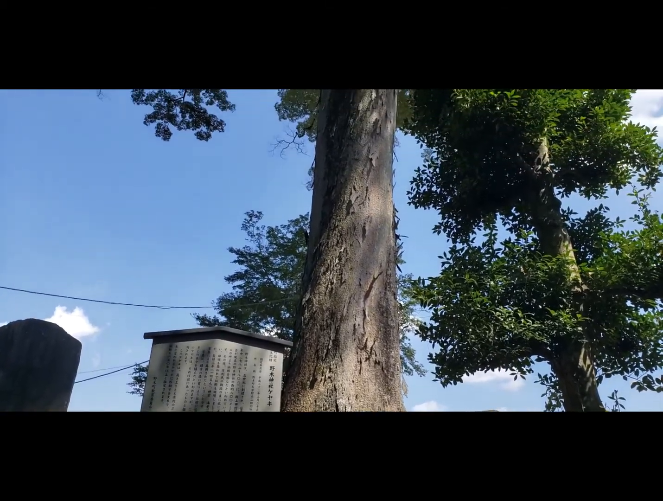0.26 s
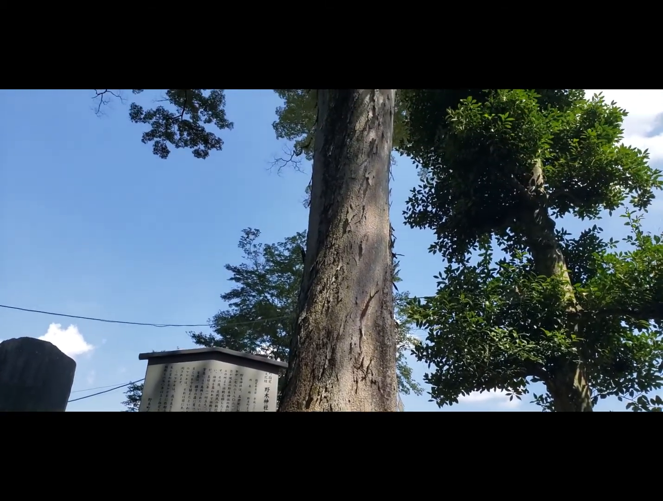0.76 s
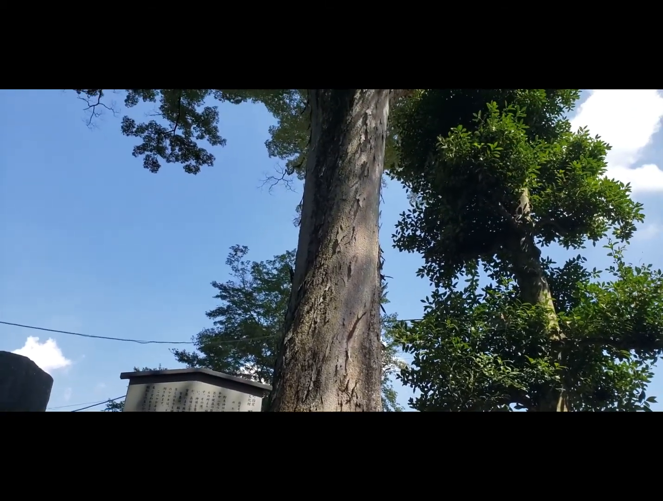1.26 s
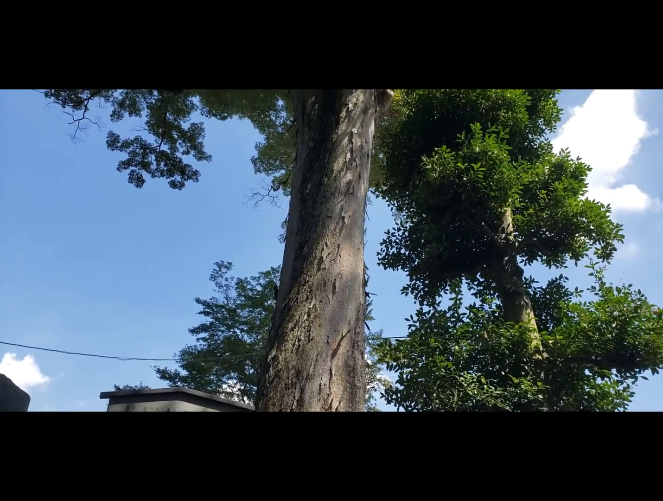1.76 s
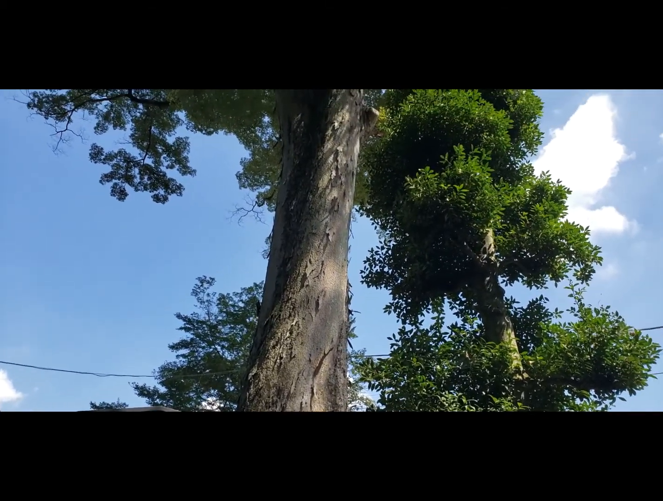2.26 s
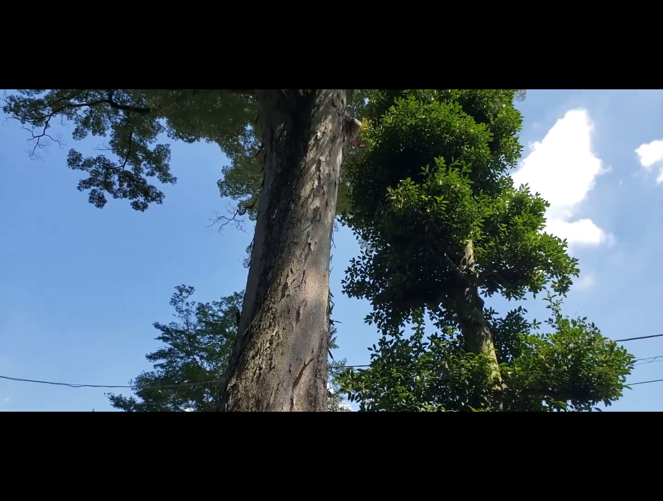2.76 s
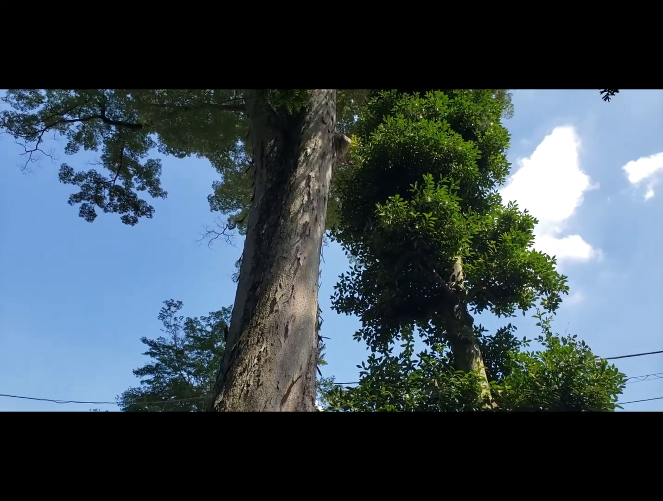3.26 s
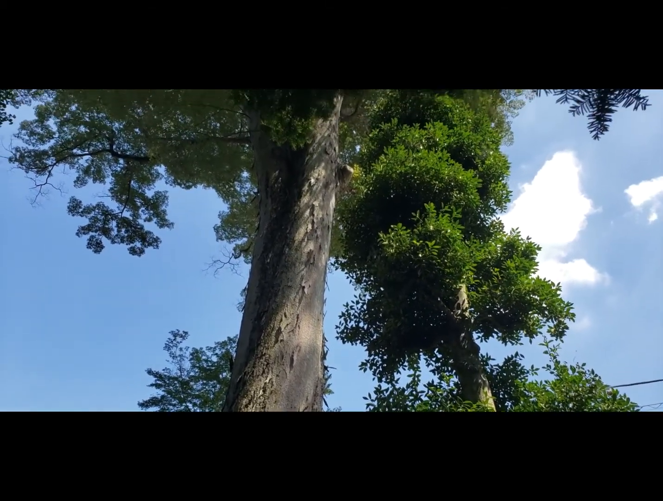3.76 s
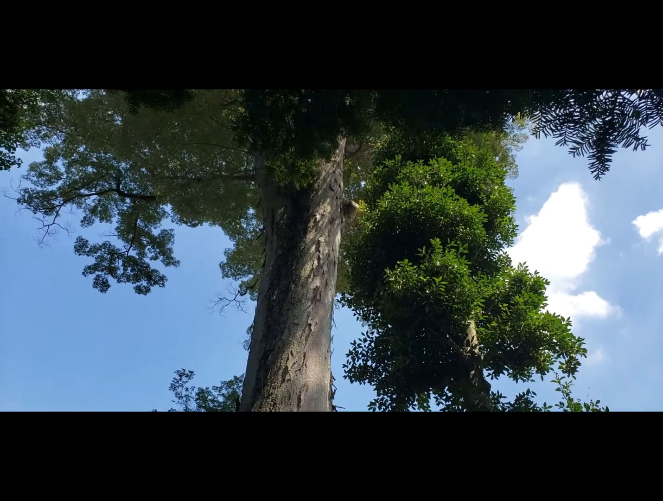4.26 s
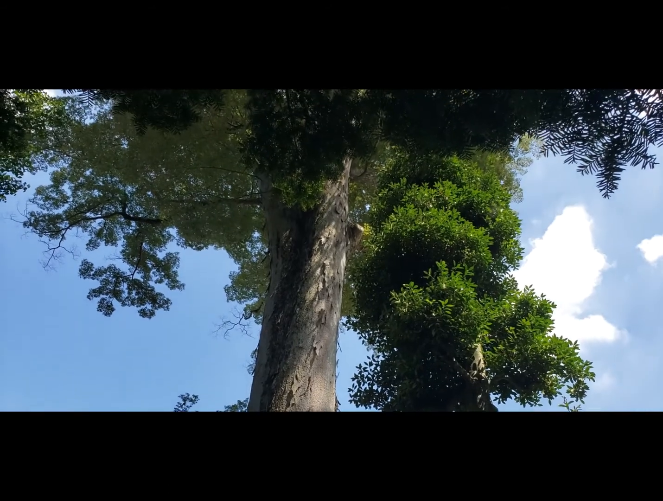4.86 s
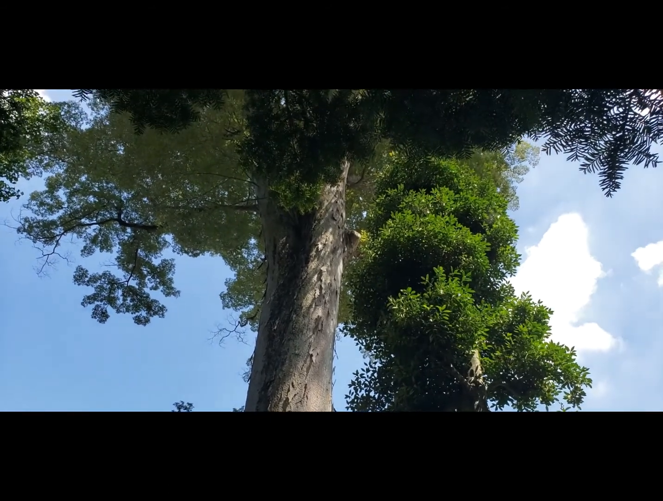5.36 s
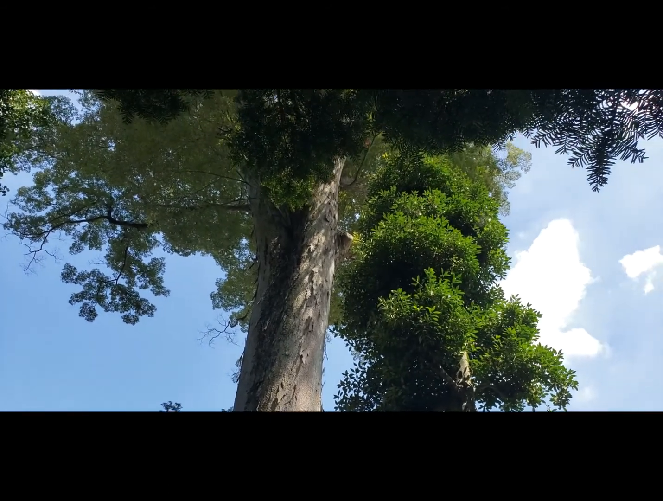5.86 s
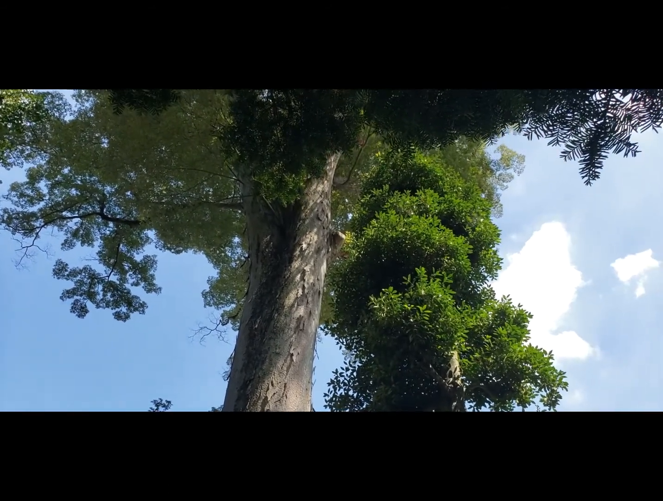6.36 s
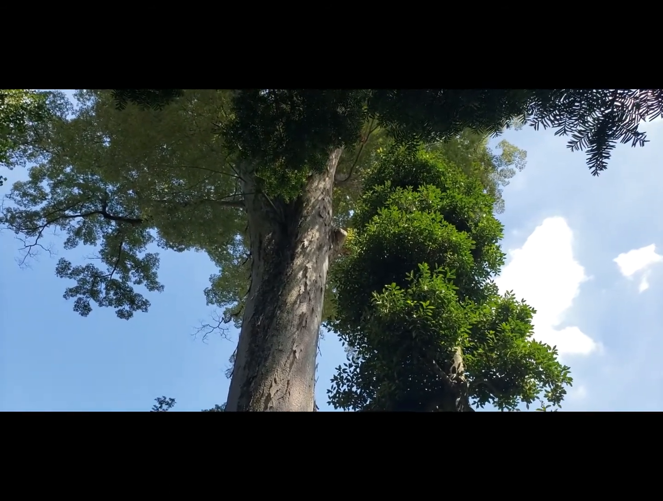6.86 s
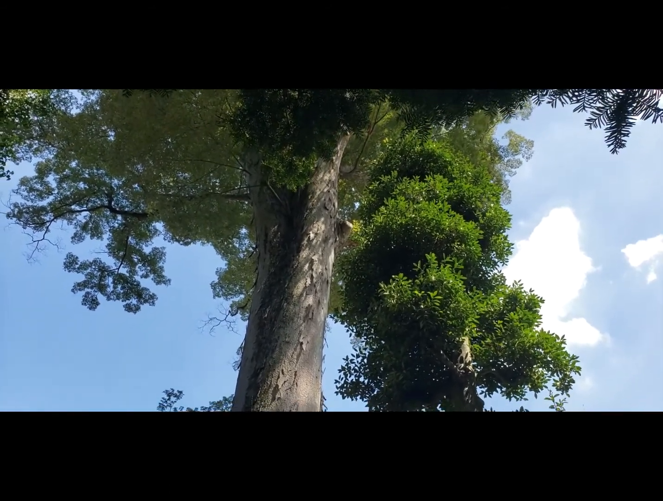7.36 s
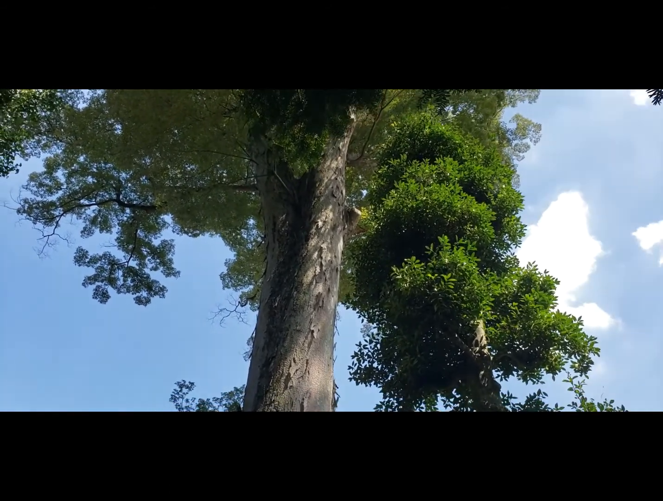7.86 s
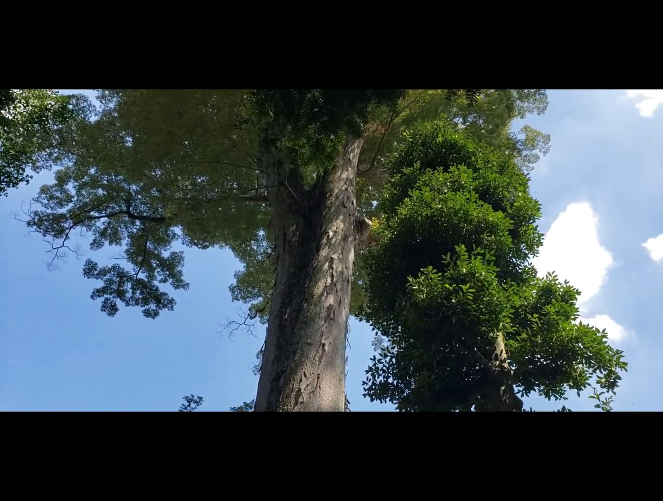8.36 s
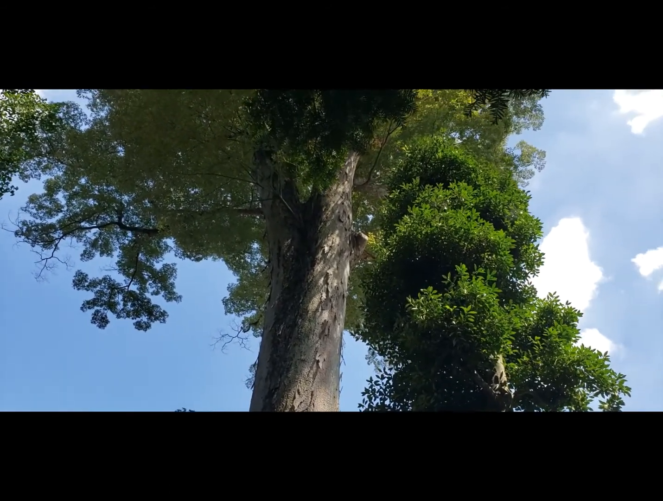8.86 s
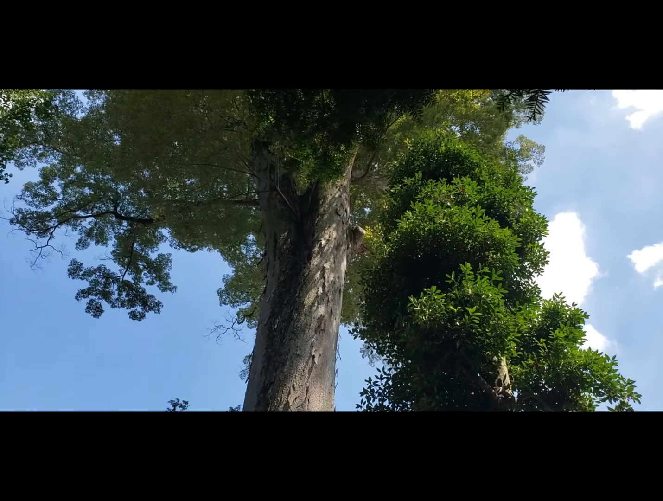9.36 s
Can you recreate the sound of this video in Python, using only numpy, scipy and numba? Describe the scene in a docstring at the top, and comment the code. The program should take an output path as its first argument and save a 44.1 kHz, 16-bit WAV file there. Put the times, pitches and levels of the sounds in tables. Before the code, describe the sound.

Outdoors in summer, a shrill throbbing cicada song grows over a fading lower insect, soft traffic rumble, and echoing far-off metallic hammer blows.

```python
"""Summer among tall trees, taken in stereo. One cicada overhead works up its song: fast clicks ring a body
that it stretches some sixteen times a second, sweeping its tone and octave upward. A lower singer further
off fades away, over a far noise of chorus, leaves and traffic in swelling bands; low engine hums are wavering
tones that come and go. A distant hammer rings modes of ground and steel, with echoes, pausing midway while
a motor speeds up and slows; late on, one hollow knock decays far off."""
import sys
import numpy as np
from scipy import signal
from scipy.fft import rfft, irfft
from scipy.io import wavfile
from scipy.ndimage import uniform_filter1d
from numba import njit

SR = 44100
rng = np.random.default_rng(int(sys.argv[2]) if len(sys.argv) > 2 else 0)


def ratio_of_db(decibels):
    """Turn decibels (scalar or array-like) into linear amplitude factors; 0 dB maps to 1."""
    return 10 ** (np.asarray(decibels, float) / 20)


def master(y):
    """Save y as 16-bit WAV."""
    cut = np.clip(np.atleast_2d(y).T, -1, 1)
    pcm = np.round(cut * 32767)  # scale
    wavfile.write(sys.argv[1], SR, pcm.astype(np.int16))


N = 423360
T = np.arange(N) / SR
LEFT_RIGHT = np.array([[1], [-1]])  # sign of a difference signal at each port


def level(x, db):
    """Scale to an rms of 1, then apply a level in dB, fixed or moving."""
    return x * ratio_of_db(db) / np.sqrt(np.mean(x ** 2))


def curve(table):
    """Columns of a table after its times, one value per sample."""
    s, *columns = np.transpose(table)
    return [np.interp(T, s, c) for c in columns]


@njit
def svf(x, hz, width):
    """State-variable band-pass with a moving centre, gain 1 there."""
    y, band, low = np.empty(len(x)), 0., 0.
    for i in range(len(x)):
        g = np.tan(np.pi * hz[i] / SR)
        damping = width / hz[i]
        v = (band + g * (x[i] - low)) / (1 + g * (g + damping))
        band = 2 * v - band
        low = low + 2 * g * v
        y[i] = damping * v
    return y


def steep(x, hz, width_hz):
    """A resonance applied twice, each pass width_hz wide, for steeper skirts."""
    hz = np.clip(hz + np.zeros(N), 20, .45 * SR)
    once = svf(x, hz, 1. * width_hz)
    return svf(once, hz, 1. * width_hz)


def walk(rate):
    """Random levels held 1 / rate s and slewed twice."""
    hold = int(SR / rate)
    steps = np.repeat(rng.standard_normal(N // hold + 1), hold)
    return uniform_filter1d(uniform_filter1d(steps, hold), hold)[:N]


def clicks(hz, jitter_s, scatter_db, limp):
    """Two membranes buckle in turn, so every second click comes late, by limp click periods."""
    phase = np.cumsum(hz) / SR
    turn = np.arange(1, int(phase[-1]))
    chance = rng.standard_normal((N // 50, 2))[:len(turn)].T
    at_s = np.interp(turn + limp * (turn % 2), phase, T) + jitter_s * chance[0]
    at = np.clip(at_s * SR, 0, N - 2)
    size, i = ratio_of_db(scatter_db * chance[1]), at.astype(int)
    # each click is split over two samples to fall between them
    return np.bincount(i, size * (1 - at + i), N) + np.bincount(i + 1, size * (at - i), N)


def ring(x, hz, t60):
    """A decaying mode, envelope starting at 1 for a unit impulse."""
    pole = np.exp(2j * np.pi * hz / SR - np.log(1000) / (t60 * SR))
    return signal.lfilter([1], [1, -pole], x).imag


def ports(x, lag_s, pan_db):
    """The sound reaches the right microphone port first; pan_db is how much louder the left is."""
    turn = np.exp(-2j * np.pi * np.fft.rfftfreq(N, 1 / SR) * lag_s)
    left = irfft(rfft(x) * turn, N) * ratio_of_db(pan_db / 2)
    return np.array([left, x * ratio_of_db(-pan_db / 2)])


def foliage(x, t60, db):
    """Scatter from trunks and leaves: a decaying noise tail, different at each port."""
    tail = rng.standard_normal((2, SR // 2)) * ratio_of_db(-60 * T[:SR // 2] / t60)
    tail = tail / np.sqrt(np.sum(tail ** 2, axis=1, keepdims=True))
    return ratio_of_db(db) * signal.fftconvolve(x[None], tail, axes=1)[:, :N]


def throbs():
    """Times and octave levels of the stretches: a slowly drifting pace, each early or late, strong or weak."""
    # pace of the stretching: start_s, rate_throbs_per_s
    throb_pace = [(0, 17.615), (2, 16.4), (3.2, 16.09), (4.3, 15.394), (5.6, 15.584), (6.8, 15.864),
                  (8.2, 16.408), (9.6, 16.178)]
    # octave at full stretch: start_s, level_db
    octave_peaks = [(0.801, -53), (1.9, -51.5), (2.5, -48.5), (3.199, -47.5), (3.9, -38), (4.25, -40),
                    (4.55, -32), (5.8, -27.5), (6.2, -31), (7.55, -25.5), (8.1, -35), (8.6, -26),
                    (8.9, -20.5), (9.25, -25.5), (9.6, -20)]
    # uneven while the song builds, steadier once it is full: start_s, scatter_db
    unevenness = [(3.3, 2.5), (3.6, 4), (4.3, 4), (4.5, 1.6)]
    first_turn = .284  # share of a throb period before the first peak
    jitter_s = .0015
    turns = np.cumsum(curve(throb_pace)[0]) / SR - first_turn
    whole = np.arange(int(turns[-1]) + 1)
    chance = rng.standard_normal((len(whole), 2)).T
    at = np.interp(whole, turns, T) + jitter_s * chance[0]
    usual_db = np.interp(at, *np.transpose(octave_peaks))
    scatter_db = np.interp(at, *np.transpose(unevenness))
    return at, usual_db + scatter_db * chance[1]


def cicada():
    """Stretching raises the body tone, fades it and opens its octave; the clicks slow a little."""
    # near song: start_s, relaxed_level_db, fully_stretched_hz
    song_course = [(0, -62, 5800), (1, -47, 5700), (2, -45.5, 6150), (3, -46.5, 6380), (3.6, -46.5, 6760),
                   (4.3, -46, 7240), (5, -43, 7400), (5.7, -41.5, 7800), (6.4, -39.5, 7640), (7, -40, 7870),
                   (7.6, -39.5, 7900), (8.2, -38, 7470), (8.8, -39.5, 7900), (9.2, -40, 8000),
                   (9.6, -43.5, 8120)]
    # one stretch around its peak, smoothed below: offset_s, stretch_0_to_1
    stretch_shape = [(-.031, 0), (-.003, .95), (.008, 1), (.02, 0)]
    # clicks when relaxed: start_s, rate_hz
    click_rate = [(0, 400), (2, 401), (3.6, 404), (4.4, 406), (5.7, 403), (6.4, 402), (7, 400.2),
                  (7.8, 400.7), (9, 402.2)]
    # stiff ribs on the membranes: pitch_hz, width_hz (each pass), relative_db
    rib_modes = [(12450, 3500, -14.5), (13980, 2050, -12)]
    relaxed_hz = 5585

    at, octave_db = throbs()
    offset, shape = np.transpose(stretch_shape)
    stretch_times = np.sort((at[:, None] + offset).ravel())
    stretch = np.interp(T, stretch_times, np.tile(shape, len(at)))
    stretch = uniform_filter1d(np.clip(stretch, 0, 1), size=300)
    tone_db, top_hz = curve(song_course)
    hz = relaxed_hz + stretch * (top_hz - relaxed_hz)
    click_hz = curve(click_rate)[0] * (1 - .012 * stretch)

    beat = clicks(click_hz, jitter_s=.000012, scatter_db=1.5, limp=.004)
    tone = level(steep(beat, hz, 900), tone_db - 14 * np.sqrt(np.abs(stretch)))
    # the air sac keeps its pitch through the stretch
    sac = level(steep(beat, 5190, 1570), tone_db - 4 - 8 * stretch)
    # a ragged undertone sounds an octave below the sac
    ragged = clicks(click_hz, jitter_s=0.000362, scatter_db=4.5, limp=0.096)
    under = level(steep(ragged, 2560, 350), tone_db - 28 - 6 * stretch)

    relaxed_db = tone_db - 15.5
    open_db = relaxed_db + stretch * (np.interp(T, at, octave_db) - relaxed_db)
    # the treble of each click is less exact in time
    crisp = clicks(click_hz, jitter_s=.00005, scatter_db=1.2, limp=.03)
    octave = level(steep(crisp, 2 * hz, 2140), open_db - 0.5)
    # the ribs ring as the octave sweeps up to them, neighbours in opposite sign
    near = steep(crisp, 2 * hz, 3800)
    ribs = np.zeros(N)
    for k, (rib_hz, width, db) in enumerate(rib_modes):
        ribs += (-1) ** k * ratio_of_db(db) * steep(near, rib_hz, width)
    ribs = level(ribs, open_db + 0.5)

    low, high = tone - sac + under, octave + ribs
    scattered = foliage(low, .1, -7) + foliage(high, .2, -5)
    return ports(low, 0.0003804, 1.0) + ports(high, 0.00043, -3.5) + scattered


def neighbour():
    """A rougher, lower singer further off: unsteady clicks ring one body tone, half lost in the leaves."""
    # its song falling silent, before the offset and flutter below: start_s, level_db
    fading_song = [(0, -51.5), (1, -47), (1.6, -47.5), (2.3, -48), (3.1, -46.5), (4, -50), (4.6, -49.5),
                   (5.4, -59), (6.5, -66.5), (7.4, -70), (9.6, -81)]
    beat = clicks(398 + 6 * walk(1.5), jitter_s=.00006, scatter_db=3.0, limp=.1)
    song_db = curve(fading_song)[0] - 3 + 4.1 * walk(16)
    song = level(steep(beat, 4425, 480), song_db)
    return ports(song, 0.0005805, 1.0) + foliage(song, 0.079, -0.5)


def far():
    """Noise bands half an octave apart swell together and flicker alone; only the bass is alike at both ports."""
    # colour of far chorus, leaves and traffic: pitch_hz, relative_db_per_hz
    far_colour = [(18, -33), (30, -7), (55, 0), (90, -5.5), (160, -15.5), (300, -24), (480, -32),
                  (1000, -33.5), (1500, -37), (1900, -28.5), (2480, -27), (3300, -31.5), (4140, -16.5),
                  (5400, -6), (6300, -14.5), (7900, -19), (8500, -18.5), (10300, -22.5), (10900, -9),
                  (13000, -18.5), (15200, -8.5), (16000, -42)]
    # rumble of traffic, used about its mean: start_s, level_db
    traffic_rumble = [(0.0, -64), (1.5, -57), (2.65, -57.5), (4.2, -61), (4.8, -54), (5.5, -59.5),
                      (6.3, -55), (7.65, -61), (8.15, -56), (9.6, -64)]
    out, swell = 0, walk(0.84)
    colour_hz, colour_db = np.transpose(far_colour)
    f = np.fft.rfftfreq(N, 1 / SR) + 1
    gain = ratio_of_db(np.interp(np.log(f), np.log(colour_hz), colour_db))
    gust = curve(traffic_rumble)[0]
    for hz in 25 * 2 ** np.arange(0, 9.5, .5):
        band = gain * np.cos(np.pi * np.clip(np.log2(f / hz), -.5, .5))
        mid, side = irfft(rfft(rng.standard_normal((2, N))) * band, N)
        # traffic moves mostly the bass
        rumble_db = (gust - gust.mean()) / (1 + (hz / 250) ** 2)
        db = .5 * swell + 2.06 * walk(9.8) + rumble_db
        wide = np.clip(0.095 + hz / 700, 0, 1)
        out = out + ratio_of_db(db) * np.sqrt(2 / (1 + wide ** 2)) * (mid + wide * side * LEFT_RIGHT)
    return level(out, -43.5)


def motors():
    """Engines far away: low sine tones that waver in level, the hums in pitch too."""
    # motor speeding up and slowing: start_s, firing_hz, level_db (rms, before wavering)
    motor_course = [(3.5, 92.2, -56), (3.95, 111.7, -58.5), (4.15, 113, -72), (4.5, 121, -67),
                    (5.07, 134.1, -59), (6.0, 129.1, -63), (6.71, 120.5, -55.5), (7.25, 111.5, -70.5)]
    # hums that come and go: pitch_hz (before wavering), level_db (rms, before wavering), start_s, end_s
    hum_list = [(82.7, -67, 0.17, 1.5), (159, -63.5, 0.57, 3.18), (60.7, -57.5, 7.9, 9.2),
                (59.6, -58, 5.42, 6.5)]
    hz, db = curve(motor_course)
    on = uniform_filter1d(1. * (T > motor_course[0][0]) * (T < motor_course[-1][0]), size=4000)
    out = on * ratio_of_db(db + 2.0 * walk(5)) * np.sin(2 * np.pi * np.cumsum(hz) / SR)
    for hum_hz, hum_db, start, end in hum_list:
        on = uniform_filter1d(1. * (T > start) * (T < end), size=9000)
        loudness = on * ratio_of_db(hum_db + 3.1 * walk(6.3))
        phase = 2 * np.pi * np.cumsum(hum_hz + 1.198 * walk(2.01)) / SR
        out = out + loudness * np.sin(phase)
    return np.sqrt(2) * out  # sine peak for a given rms


def hammer():
    """Each thud arrives as a few strong echoes in a dense scatter that swells and dies; the steel rings on."""
    # blows, levels before the offsets below: start_s, thud_db, steel_ring_db
    blow_list = [(0.337, -41, -56.5), (1.345, -31.5, -42), (2.355, -30.5, -40), (3.371, -30, -39.5),
                 (4.449, -31.5, -42.5), (8.459, -43.5, -55.5), (9.496, -43, -53)]
    # modes of what is struck and the ground under it: pitch_hz, relative_db, t60_s
    thud_modes = [(90.3, -1.5, 0.04), (117, -6, 0.072), (181, -0.5, 0.034), (232.6, -4, 0.046),
                  (257.3, -16, 0.17), (335.3, -1, 0.1), (364, 2.5, 0.085), (465, -7.5, 0.079),
                  (550, -7.5, 0.013), (680, -9, 0.018), (817, -8, 0.042), (932, -7, 0.026),
                  (1067, -6, 0.032), (1141, -8, 0.063), (1233, -16, 0.17), (1411, -10, 0.026),
                  (1770, -12, 0.018), (2375, -13.5, 0.23)]
    # modes of the steel, the main one a close pair that beats: pitch_hz, relative_db, t60_s
    steel_modes = [(2376, -14, .3), (2384, -9, .45), (2838, 0, .65), (2846, -5, .65), (2990, -9, .1),
                   (3185, -8, .4), (2650, -18, .15)]
    # strong echoes of a blow from buildings: delay_s, relative_db
    building_echoes = [(0, -22), (0.013, 0.5), (.027, 3), (.04, -2.5), (.115, -6)]
    haze_db = 37  # how far the drive of the scattered ring lies under the blow's steel level
    steel_echo_s, steel_echo_db = .09, -7

    echoes, scatter, strike = np.zeros(N), np.zeros((2, N)), np.zeros(N)
    for s, thud_db, steel_db in blow_list:
        for delay, db in building_echoes:
            echoes[min(int((s + delay) * SR), N - 1)] += ratio_of_db(thud_db + db - 11.5)
        strike[int((s + .008) * SR)] = ratio_of_db(steel_db + 6)
        age = np.maximum(T - s, 0)
        size = ratio_of_db(np.array([[thud_db - 28.5], [steel_db - haze_db]]))
        scatter += size * (1 - np.exp(-age / 0.031)) * ratio_of_db(-60 * age / .5)

    mid, side = rng.standard_normal((2, N)) * scatter[0]
    thud = np.zeros((2, N))
    for hz, db, t60 in thud_modes:
        # the bass of the scatter is alike at both ports
        wide = min((hz / 800) ** 2, 1.1)
        thud += ratio_of_db(db) * (ring(echoes + mid, hz, t60) + wide * ring(side, hz, t60) * LEFT_RIGHT)

    steel = sum(ratio_of_db(db) * ring(strike, hz, t60) for hz, db, t60 in steel_modes)
    # distance rounds off the click of the contact
    steel = steep(steel, 2800, 1400)
    # the main ring returns, blurred, from walls straight ahead
    delayed = np.interp(T - steel_echo_s, T, steel)
    returned = ratio_of_db(steel_echo_db) * steep(delayed, 2841, 30)
    shimmer = scatter[1] * rng.standard_normal((2, N))
    haze = sum(ratio_of_db(db) * ring(shimmer, hz, t60 * .4) for hz, db, t60 in steel_modes)
    return thud * ratio_of_db(-1.2 * LEFT_RIGHT) + ports(steel, 0.000212, 0) + returned + haze


def knock():
    """A faint wooden knock far off: one decaying sine, its start softened by distance."""
    # the hollow knock: start_s, level_db (peak, before softening), pitch_hz, t60_s
    hollow_knock = [(7.727, -55.5, 744, 0.47)]
    s, db, hz, t60 = hollow_knock[0]
    age = np.maximum(T - s, 0)
    envelope = ratio_of_db(db - 60 * age / t60) * (1 - np.exp(-age / 0.0034))
    return envelope * np.sin(2 * np.pi * hz * age)


def scene():
    """All sources as they reach the two microphone ports."""
    return cicada() + neighbour() + far() + motors() + hammer() + knock()


def roll_off(x):
    """The treble ends steeply here."""
    return signal.sosfilt(signal.butter(12, 15900, fs=SR, output="sos"), x)


def record(dry):
    """A phone that cuts the top of the treble and the deep bass."""
    treble_cut = signal.ellip(8, .1, 40, 15450, fs=SR, output="sos")
    bass_cut = signal.butter(4, 36, "highpass", fs=SR, output="sos")
    mix = signal.sosfiltfilt(treble_cut, dry)
    mix = signal.sosfilt(bass_cut, mix)
    return roll_off(mix)


dry = scene()
out = record(dry)
master(out)
```